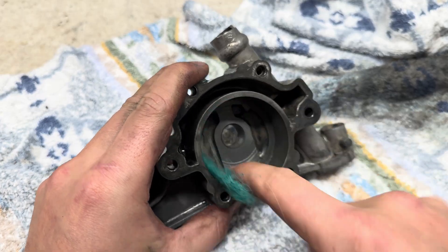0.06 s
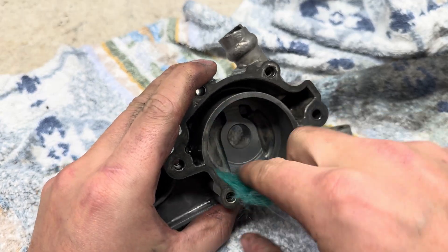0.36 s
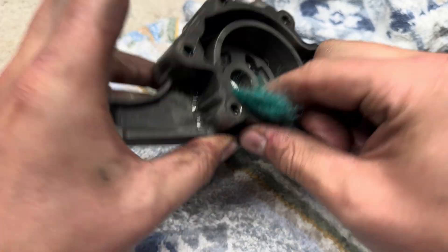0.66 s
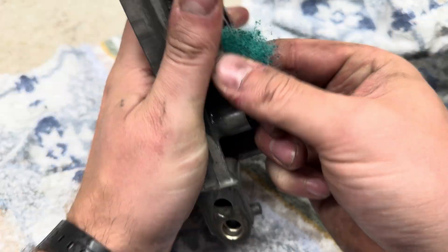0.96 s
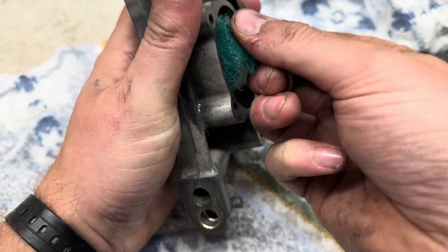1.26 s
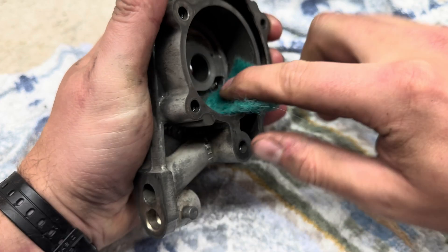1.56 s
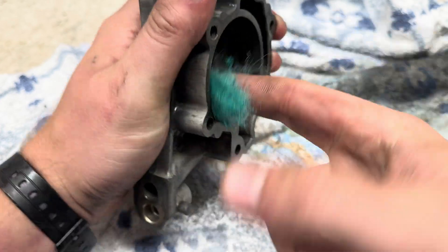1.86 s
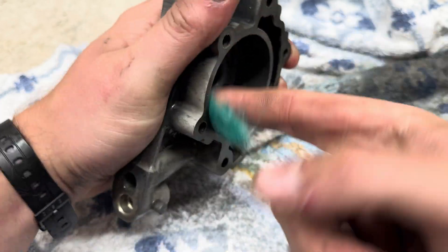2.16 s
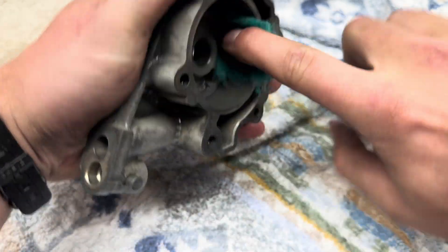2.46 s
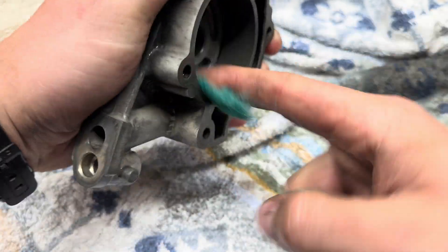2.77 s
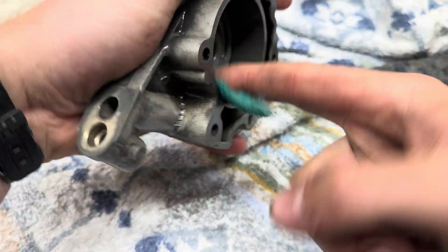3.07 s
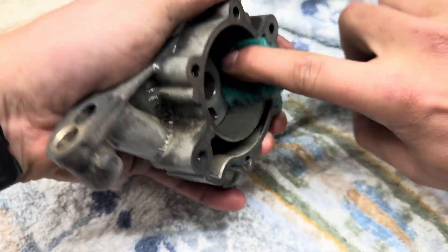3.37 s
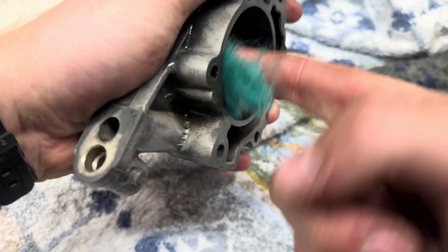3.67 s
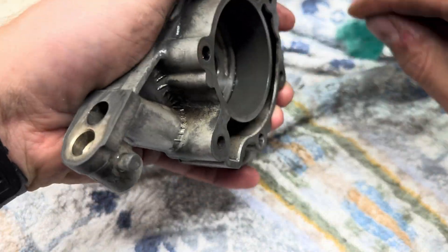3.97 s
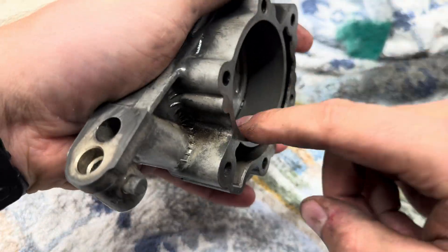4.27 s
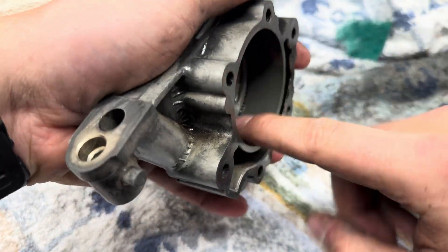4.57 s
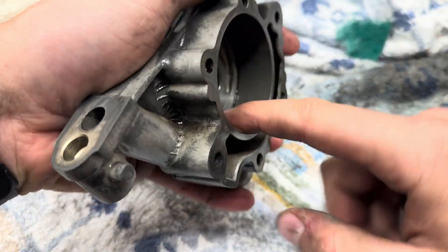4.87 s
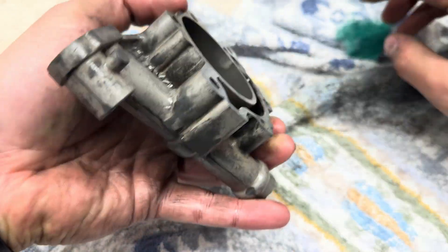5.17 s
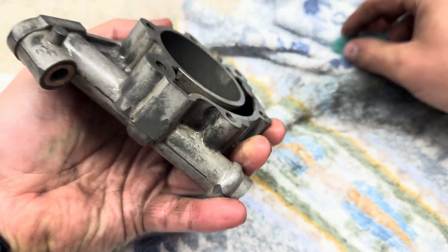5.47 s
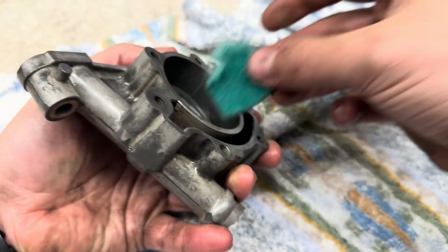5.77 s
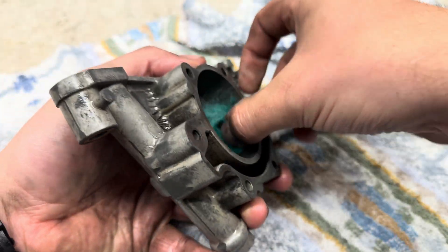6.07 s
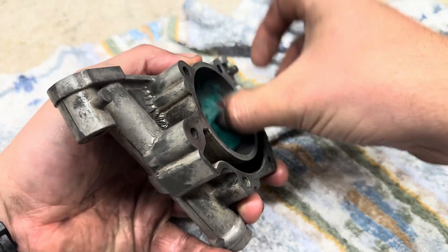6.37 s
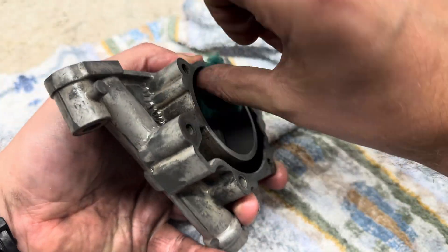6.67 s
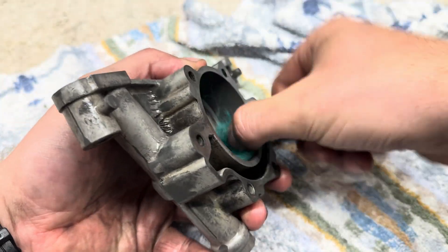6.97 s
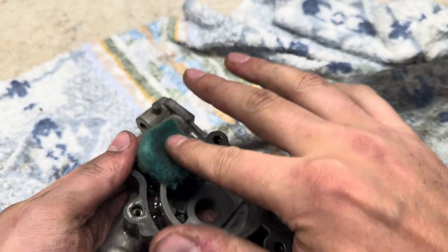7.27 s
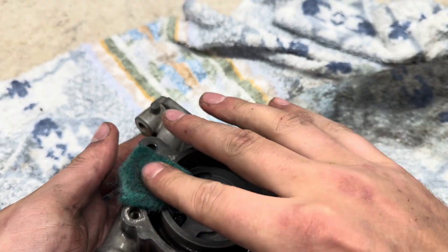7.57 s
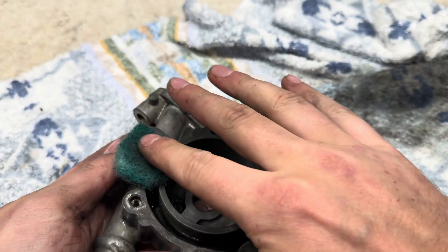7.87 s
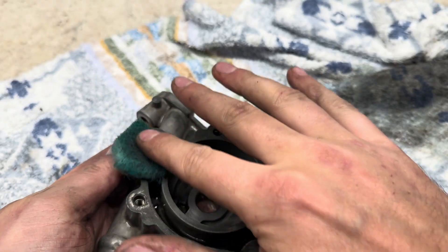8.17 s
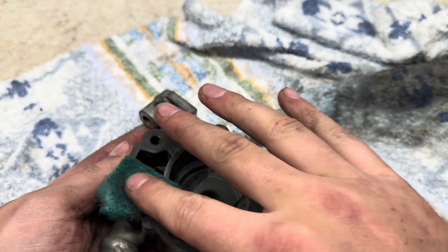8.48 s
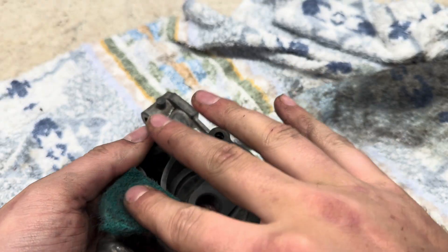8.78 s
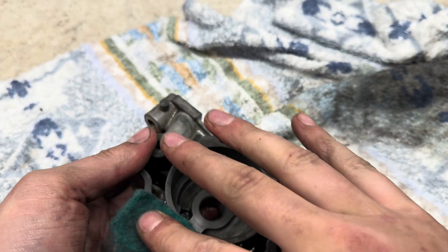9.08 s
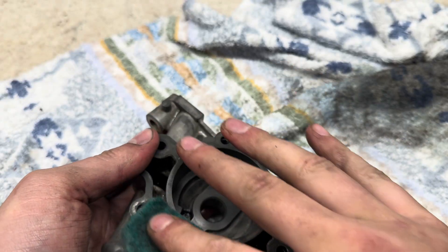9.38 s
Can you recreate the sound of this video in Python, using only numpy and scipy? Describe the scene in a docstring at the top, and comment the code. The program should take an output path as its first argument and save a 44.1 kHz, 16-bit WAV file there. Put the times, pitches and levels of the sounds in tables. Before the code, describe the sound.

An abrasive pad scrubs to and fro inside a hand-held metal casing, each stroke a bright hiss and rasp that faintly rings the metal. A few smoother fingertip wipes and a brief lull come midway before the scrubbing resumes. Near the end the strokes turn short and quick, with tiny squeaks, muffled knocks and a low bench rumble. It is heard close up in a quiet workshop.

```python
"""Scrubbing a metal casing

An abrasive pad is scrubbed to and fro in a hand-held cast metal engine casing, close by in a quiet
workshop. Its fibres catch and slip, hissing and ringing the metal: long pushes and pulls round the bore,
then short quick strokes on the flat face with the part pressed on a towel, where it knocks and rocks
the bench."""
import sys
import numpy as np
from scipy import signal
from scipy.fft import rfft, irfft
from scipy.io import wavfile
from scipy.ndimage import map_coordinates

SR = 44100
rng = np.random.default_rng(int(sys.argv[2]) if len(sys.argv) > 2 else 0)


def dump(signal):
    """Clip the signal to [-1, 1] and save it as 16-bit WAV at the path in sys.argv[1]."""
    limited = np.clip(np.atleast_2d(signal).T, -1, 1)
    pcm = np.round(limited * 32767).astype(np.int16)
    wavfile.write(sys.argv[1], SR, pcm)


N = 416304
T = np.arange(N) / SR
BINS = np.arange(N // 2 + 1) * SR / N
TURN_S = 7.09  # the pad leaves the bore for the flat face
BITE_S, RELEASE_S = 0.01, 0.018  # the pad takes hold and lets go

# The pad snags and the stroke flares: centre_s, length_s, boost_db
PAD_SNAGS = [(2.96, 0.04, 2.5), (3.797, 0.017, 10.5), (4.35, 0.11, 5.5), (4.514, 0.042, 1.5),
             (4.914, 0.01, 8), (8.05, 0.013, 6), (8.322, 0.01, 7.5)]
# The pad digs into an edge and rasps harder: centre_s, length_s, boost_db
PAD_DIGS = [(7.684, 0.022, 5)]
RASP_SHARE = .5  # the rasp swells by this share of the hiss's swell in dB


def scrubbing():
    """The pad grips and lets go in tufts, so every stroke flutters; now and then it snags or digs in."""
    hiss_gain, rasp_gain = motion()
    face = 1. * (T > TURN_S)
    snag_db = sum(db * swell(s, length) for s, length, db in PAD_SNAGS)
    dig_db = sum(db * swell(s, length) for s, length, db in PAD_DIGS)
    tufts = amp(1.6 * walk(35) + 1.35 * walk(350))  # flutter and finer grain
    hiss_gain = hiss_gain * tufts * amp(snag_db)
    rasp_gain = rasp_gain * tufts * amp(RASP_SHARE * snag_db + dig_db)
    return hiss(hiss_gain, face) + rasp(rasp_gain, face) + judder(rasp_gain * face)


# Where the hand is fastest, as a share of the stroke: a push late, a pull early, a sweep midway
PUSH, PULL, SWEEP = 0.73, 0.29, 0.57
# Strokes round the bore, the weak ones drags as the part turns: start_s, length_s, crest_db, crest_share
BORE_PASSES = [(0, 0.16, -41.5, PULL), (0.243, 0.14, -48, SWEEP), (0.401, .13, -55, SWEEP),
               (0.562, .12, -54.5, SWEEP), (0.86, 0.087, -53, SWEEP), (1.098, 0.25, -58.5, SWEEP),
               (1.323, .22, -41, PUSH), (1.601, .15, -41.5, PULL), (1.794, 0.17, -40, PUSH),
               (2.022, .14, -39.5, PULL), (2.218, 0.17, -40.5, PUSH), (2.439, 0.17, -40, PULL),
               (2.666, 0.19, -38, PUSH), (2.896, 0.24, -39.5, PULL), (3.14, 0.19, -39, PUSH),
               (3.377, .2, -39.5, PULL), (3.611, .2, -42, SWEEP), (4.203, 0.22, -49.5, PUSH),
               (4.48, 0.23, -43, PULL), (4.771, 0.17, -43.5, PUSH), (4.974, 0.15, -63, PULL),
               (5.179, 0.21, -58.5, PULL), (5.392, 0.33, -70.5, PULL), (5.813, 0.12, -58, PULL),
               (5.954, 0.3, -46, SWEEP), (6.289, 0.16, -43.5, SWEEP), (6.499, 0.16, -43, SWEEP),
               (6.711, 0.17, -43, SWEEP), (6.959, .12, -43, SWEEP)]
# Quick strokes on the flat face: start_s, length_s, crest_db
FACE_PASSES = [(7.114, 0.022, -44.5), (7.181, 0.063, -44.5), (7.282, 0.061, -40.5), (7.389, 0.071, -42.5),
               (7.493, 0.055, -42.5), (7.582, 0.067, -50.5), (7.658, 0.068, -53.5), (7.761, 0.054, -52),
               (7.832, 0.053, -61.5), (7.91, 0.065, -47), (8.021, 0.076, -43.5), (8.137, 0.1, -45),
               (8.232, 0.12, -43), (8.307, 0.1, -45.5), (8.438, 0.11, -56.5), (8.551, 0.092, -51),
               (8.694, 0.039, -49), (8.78, 0.073, -47), (8.896, 0.067, -45.5), (9.011, 0.07, -43),
               (9.121, 0.069, -43.5), (9.244, 0.078, -39), (9.361, 0.075, -42)]
FINGER_FROM_S, FINGER_TO_S = 4.1, 4.9  # the pad is laid aside and a fingertip wipes the bore


def motion():
    """Hiss and rasp envelopes of all strokes: a fingertip rasps less, the pad on the face more."""
    strokes = []
    for s, length, db, crest in BORE_PASSES:
        fingertip = FINGER_FROM_S < s + length / 2 < FINGER_TO_S
        strokes.append(stroke(s, length, db, crest, fall_db_per_s=80, bite_db=-8.5 if fingertip else 0))
    for s, length, db in FACE_PASSES:
        strokes.append(stroke(s, length, db, crest=0.28, fall_db_per_s=112, bite_db=6.5))
    envelopes = np.zeros((2, N))
    for first, gains in strokes:
        span = slice(first, first + gains.shape[1])
        envelopes[:, span] = np.maximum(envelopes[:, span], gains)
    return envelopes


def stroke(start, length, db, crest, fall_db_per_s, bite_db, rise_db_per_s=67, creep_s=.06):
    """First sample and hiss and rasp gains of a stroke: it takes hold, speeds up, slows and lets go."""
    t = np.arange(int((length + 2 * creep_s) * SR)) / SR - creep_s
    attack = np.clip(t / BITE_S / 2 + 0.5, 0, 1)
    release = np.clip((length - t) / RELEASE_S / 2 + 0.6, 0, 1)
    # the pad still creeps at each turn of direction
    creep = amp(-18) * np.clip(np.minimum(t, length - t) / creep_s + 1, 0, 1)
    past_crest_s = np.clip(t, 0, length) - crest * length
    hiss_db = db + np.minimum(rise_db_per_s * past_crest_s, -fall_db_per_s * past_crest_s)
    rasp_db = -37.5 + RASP_SHARE * hiss_db + bite_db
    gains = amp([hiss_db, rasp_db]) * np.maximum(attack * release, creep)
    first = int((start - creep_s) * SR)
    return max(first, 0), gains[:, max(-first, 0):N - first]


# Tone of the hiss in the bore and on the face: freq_hz, gain_db
BORE_HISS_EQ = [(5000, -41), (7400, -17), (8100, -1.5), (9500, 0.5), (13600, 4.5), (15000, 2.5),
                (16000, -1.5)]
FACE_HISS_EQ = [(5000, -69), (7500, -28), (8200, -1.5), (10200, 2), (14200, -5), (16000, -2)]
# The metal's top modes, stirred by single fibres: pitch_hz, damped_width_hz, bore_db, face_db, free_db
SHIMMER_MODES = [(8250, 210, -22, -18.5, 5), (9340, 140, -10, -10, -3), (10090, 150, -10, -10, 2),
                 (11130, 80, -16, -24, -1), (12550, 74, -24, -12, -6), (13980, 130, -22, -17, -9)]


def hiss(gain, face):
    """The finest fibres hiss and stir the top modes, each now more, now less as the contact moves."""
    fibres = np.array([slips(per_s=17000, scatter_db=0) for _ in range(2)])
    fibres = hollow(fibres, echo=0.32, lag_s=0.000501, sway=0.078, drift_per_s=7)
    bright = (1 - face) * colour(fibres, BORE_HISS_EQ) + face * colour(fibres, FACE_HISS_EQ)
    direct = spread(bright, side=0.083) * gain * amp(-2.5)
    shimmer = 0
    for hz, width, bore_db, face_db, _ in SHIMMER_MODES:
        feed = amp(bore_db + face * (face_db - bore_db) + 3.6 * walk(9.4) - 2)
        shimmer = shimmer + rfft(fibres[0] * gain * feed) * resonance(hz, width)
    return direct + irfft(shimmer, N) / fibres[0].std()


# Tone of the rasp in the bore and on the face: freq_hz, gain_db
BORE_RASP_EQ = [(600, -17), (1200, -9), (1800, 0.5), (2500, -8.5), (3600, -2.5), (4250, 4), (4750, -5.5),
                (5400, -2.5), (7000, -1.5), (11000, -7)]
FACE_RASP_EQ = [(300, -11), (700, -6), (1100, -9), (1600, 7), (2250, -2.5), (4700, 2.5), (6200, -3.5),
                (7500, -4), (11000, -3)]
# The casing's four main modes: pitch_hz, width_hz, pan_left_db, left_lead_rad
WALL_MODES = [(1923, 12.6, -1, 1.83), (2945, 35, 7.5, 1.82), (4330, 39, 7.5, 0.16), (4993, 19, 1, 1.05)]
# Each new grip damps other modes: start_s, mode1_db, mode2_db, mode3_db, mode4_db
GRIP_DAMPING = [(0, -11.5, -12.5, -5.5, -14), (1.77, -7.5, -10.5, -13.5, -13.5), (2.63, -19, -9, -16, -10),
                (4.05, -19, -8.5, -5, -4.5), (5.72, -8, -7.5, -5.5, -10), (7.09, -15, -13.5, -8, -24)]


def rasp(gain, face, bore_catches_per_s=9000, face_catches_per_s=5000):
    """Abrasive grit catches on the casting and rings its walls; the grip decides which modes speak."""
    fine = np.array([slips(bore_catches_per_s, scatter_db=1) for _ in range(2)])
    coarse = np.array([slips(face_catches_per_s, scatter_db=1) for _ in range(2)])
    in_bore = colour(hollow(fine, echo=0.48, lag_s=0.0007976, sway=0.192, drift_per_s=6), BORE_RASP_EQ)
    on_face = colour(hollow(coarse, echo=0.41, lag_s=0.000408, sway=0.25, drift_per_s=13), FACE_RASP_EQ)
    walls = [wander(x, share=.02, per_s=7) for x in in_bore]
    out = spread((1 - face) * walls + face * on_face, side=0.73) * pan(1.8) * gain * amp(2.12)
    # on the face, the pocket of air under the fingers rings broadly and changes size as they move
    pocket = irfft(rfft(coarse[0]) * resonance(hz=1540, width_hz=180), N)
    out += pan(15.4) * wander(pocket, share=.07, per_s=20) * face * gain * amp(-15.5)
    grips = np.array(GRIP_DAMPING)
    held_db = grips[np.searchsorted(grips[1:, 0], T), 1:].T
    for mode, db in zip(WALL_MODES, held_db):
        feed = amp(db - 1 + 3.2 * walk(16))
        out += ring(slips(bore_catches_per_s, scatter_db=1) * gain * feed, *mode)
    return out


def hollow(pair, echo, lag_s, sway, drift_per_s):
    """Echoes between wall and fingers: the grip differs and drifts, giving each stroke its own colour."""
    starts = [row[0] - BITE_S for row in BORE_PASSES + FACE_PASSES]
    stroke_index = np.searchsorted(starts, T)
    for lag_ratio in (.5, 1, 2):
        grip = rng.standard_normal(len(starts) + 1)[stroke_index]
        delay_s = lag_ratio * lag_s * np.exp(sway * grip + .05 * walk(drift_per_s))
        pair = pair + echo * np.array([np.interp(T - delay_s, T, x) for x in pair])
    return pair


# The low scuff grows as the hand leans harder on the part: time_s, gain_db
JUDDER_RIDE = [(8.2, -17.5), (9.4, -5)]


def judder(gain):
    """Each stroke on the face shakes the casing against the towel with a low scuff."""
    shake = bandpass(rng.standard_normal((2, N)), 100, 500)
    return spread(shake, side=0.35) * gain * curve(JUDDER_RIDE)


# Brief squeals, each on the wall mode nearest its pitch: centre_s, length_s, pitch_hz, level_db
SQUEALS = [(0.474, 0.12, 1930, -60), (0.628, 0.068, 1930, -51), (0.656, 0.019, 5000, -57.5),
           (0.906, .07, 1930, -62), (1.302, 0.071, 1930, -55.5), (2.82, 0.051, 5000, -60),
           (3.295, .07, 5000, -65), (3.784, 0.029, 2950, -63.5), (5.047, 0.24, 2950, -71.5),
           (5.277, 0.037, 1930, -59.5), (5.604, 0.043, 5000, -67.5), (6.22, .06, 1930, -60),
           (8.215, 0.054, 4330, -55.5), (8.36, 0.11, 4330, -58), (8.607, 0.072, 4330, -51)]


def singing(decay_db_per_s=251):
    """Stick and slip lock on to a mode: a thin, wavering tone swells and rings away."""
    out = np.zeros((2, N))
    for hz, _, pan_db, lead in WALL_MODES:
        gain = np.zeros(N)
        for s, length, sung_hz, db in SQUEALS:
            if abs(sung_hz / hz - 1) < .03:
                tail = (T > s) * amp(-decay_db_per_s * np.clip(T - s, 0, 1))
                gain += amp(db) * np.maximum(swell(s, length), tail)
        phase = 2 * np.pi * hz * T + .6 * walk(50) + np.array([[lead], [-lead]]) / 2
        out += pan(pan_db) * unit(np.sin(phase)) * gain * amp(2.2 * walk(60))
    return out


# The casing is turned and slides over the fingers: start_s, length_s, level_db
FINGER_SLIDES = [(4.986, 0.18, -61), (5.169, 0.21, -69)]


def sliding():
    """With no pad to damp them, the top modes ring thin and clear as the metal slides over the fingers."""
    gain = np.zeros(N)
    for s, length, db in FINGER_SLIDES:
        add(gain, s, amp(db) * arch(length))
    free_modes = sum(amp(db) * resonance(hz, width_hz=28) for hz, *_, db in SHIMMER_MODES)
    friction = slips(per_s=7200, scatter_db=1) * gain
    return irfft(rfft(friction) * free_modes / free_modes.std(), N)


# A nail or a snagged fibre flicks the metal: start_s, peak_db, centre_hz, decay_s
FLICKS = [(0.279, -50, 1560, 0.023), (0.694, -46, 1340, 0.0079), (2.529, -54, 1210, 0.0088),
          (2.556, -57, 1120, 0.0046), (3.494, -52, 1310, 0.0083), (3.78, -51, 900, 0.0068),
          (3.797, -43, 1300, 0.0052), (5.632, -51, 1820, 0.0049), (6.357, -57, 1100, 0.0072),
          (6.486, -59, 1100, 0.0065), (7.11, -59, 1200, 0.0065), (7.224, -40.5, 4740, 0.0063),
          (7.921, -43, 3020, 0.0027)]


def ticks(ring_db=-24):
    """Each flick is a short crack that leaves the casing ringing."""
    cracks, t = np.zeros(N), T[:SR // 10]
    for s, db, hz, decay in FLICKS:
        noise = signal.lfilter(*signal.iirpeak(hz, Q=1, fs=SR), rng.standard_normal(len(t)))
        crack = noise * np.exp(-t / decay)
        add(cracks, s, amp(db) * crack / abs(crack).max())
    casing = sum(resonance(hz, width) for hz, width, *_ in WALL_MODES)
    return cracks + amp(ring_db) * irfft(rfft(cracks) * casing, N)


# The casing knocks through the towel: start_s, force_db, contact_s
TOWEL_KNOCKS = [(5.533, -55.5, 0.005), (5.695, -46, 0.023), (8.549, -40.5, .0012), (8.562, -40, 0.0012),
                (8.577, -31.5, 0.0045), (8.601, -37, 0.0077), (8.817, -40.5, 0.0091),
                (8.966, -44.5, 0.0044)]
# The bench's body: pitch_hz, gain_db, t60_s
BENCH_BODY = [(55, 3, 0.43), (97.4, 0, 0.24), (138, 3, 0.077), (258, 2.5, 0.038), (326, 7.5, 0.048),
              (418, 0, 0.055), (810, -5, 0.028)]
# Tone of the bench's rumble: freq_hz, gain_db
RUMBLE_EQ = [(38, -18), (53, 4), (72, -15), (97, -8), (150, -22), (900, -51)]
# The rumble rising and falling under the hands: time_s, level_db
RUMBLE_RIDE = [(5.4, -81), (5.65, -67), (5.9, -71.5), (7.1, -78), (7.3, -61.5), (7.7, -56.5), (7.85, -72),
               (8.52, -57.5), (9.13, -49), (9.22, -47.5)]


def bench():
    """Knocks ring the bench, the softer the duller, and it rumbles under the working hands."""
    knocks, t = np.zeros(N), T[:SR // 2]
    body = sum(amp(db - 60 * t / t60) * np.sin(2 * np.pi * hz * t) for hz, db, t60 in BENCH_BODY)
    for s, db, contact in TOWEL_KNOCKS:
        push = np.sin(np.pi * np.minimum(t / contact, 1))
        add(knocks, s, amp(db) * signal.fftconvolve(body, push / push.sum()))
    rumble = spread(colour(rng.standard_normal((2, N)), RUMBLE_EQ), side=0.1)
    return knocks + rumble * curve(RUMBLE_RIDE)


# Tone of skin on metal: freq_hz, gain_db
SKIN_EQ = [(50, -1), (250, 2), (520, -3), (720, -15.5), (1500, -8.5), (4000, -19.5), (16000, -16.5)]
# Palm and fingers shifting their hold: time_s, level_db
HANDLING_RIDE = [(0, -70.5), (.8, -64.5), (1.15, -70), (1.45, -70), (2.4, -77.5), (3.3, -82), (3.85, -66),
                 (4.1, -81), (5.15, -80), (5.35, -71), (5.55, -73), (5.8, -78.5)]


def hands():
    """Skin drags dully and unevenly over the casting."""
    skin = np.array([slips(per_s=2500, scatter_db=2.5) for _ in range(2)])
    flutter = amp(2.5 * walk(16))
    return spread(colour(skin, SKIN_EQ), side=0.66) * curve(HANDLING_RIDE) * flutter


# Skin drags on the casing and sounds the hollow of the hand: start_s, length_s, level_db, pitch_hz
PALM_RUBS = [(0.31, 0.2, -76, 530), (0.59, 0.37, -72, 536), (1.02, 0.2, -77, 492), (1.66, 0.19, -71, 470),
             (2.9, 0.28, -73.5, 492), (3.426, 0.2, -72, 494), (3.636, 0.33, -74, 541),
             (6.022, 0.24, -78, 445)]


def rubs():
    """Each drag of skin is a dull scuff with a hollow note on top, set by how the hand is cupped."""
    out, skin = np.zeros(N), slips(per_s=1000, scatter_db=2)
    scuff = unit(bandpass(skin, 170, 540, order=3))
    for s, length, db, hz in PALM_RUBS:
        gain = arch(length)
        span = slice(int(s * SR), int(s * SR) + len(gain))
        cavity = signal.iirpeak(hz, Q=hz / 32, fs=SR)
        note = unit(signal.lfilter(*cavity, signal.lfilter(*cavity, skin[span])))
        add(out, s, amp(db) * gain * (note + scuff[span]))
    return out


def rustle(start_s=5.25, length_s=.16, level_db=-71):
    """Dry skin crackles in the middle range as the casing rolls over."""
    gain = np.zeros(N)
    add(gain, start_s, amp(level_db) * arch(length_s))
    return unit(bandpass(slips(per_s=1500, scatter_db=2), 750, 1900)) * gain


# Room tone of the workshop: freq_hz, gain_db
ROOM_EQ = [(60, 4), (95, -6.5), (450, -12.5), (650, -20.5), (1200, -24), (1850, -5.5), (2400, -12),
           (3800, -23.5), (16000, -32)]


def workshop(hum_hz=50):
    """Faint steady room noise, a little stronger on the left, and a low hum."""
    air = spread(colour(rng.standard_normal((2, N)), ROOM_EQ), side=0.4) * pan(4.2)
    hum = np.sin(2 * np.pi * hum_hz * T)
    return (air + hum) * amp(-71)


def slips(per_s, scatter_db):
    """Friction as tiny random clicks of letting go, a few larger than the rest."""
    size = amp(scatter_db * np.minimum(rng.exponential(size=N), 5))
    return unit((rng.random(N) < per_s / SR) * size * rng.standard_normal(N))


def resonance(hz, width_hz):
    """Frequency response of one damped mode, of power 1."""
    response = 1j * BINS * width_hz / (hz ** 2 - BINS ** 2 + 1j * BINS * width_hz)
    return response / np.sqrt(np.mean(abs(response) ** 2))


def ring(drive, hz, width_hz, pan_db, lead_rad):
    """A mode rung by the drive; its lobes reach left and right with their own level and phase."""
    spectrum = rfft(drive) * resonance(hz, width_hz)
    return pan(pan_db) * irfft(spectrum * np.exp(.5j * np.array([[lead_rad], [-lead_rad]])), N)


def wander(x, share, per_s):
    """Let every resonance in x slide up and down by a share of its pitch."""
    return map_coordinates(x, [np.cumsum(1 + share * walk(per_s))], order=1, mode="mirror")


def walk(per_s):
    """Random drift that turns per_s times a second; spread near 1."""
    count = int(T[-1] * per_s) + 2
    return np.interp(T * per_s, np.arange(count), rng.standard_normal(N // 20)[:count])


def colour(x, eq):
    """Shape x with (freq_hz, gain_db) points, at rms 1."""
    hz, db = np.transpose(eq)
    return unit(irfft(rfft(x) * amp(np.interp(np.log(BINS + 1), np.log(hz), db)), N))


def bandpass(x, low_hz, high_hz, order=2):
    """Keep one band of x."""
    return signal.sosfilt(signal.butter(order, [low_hz, high_hz], "band", fs=SR, output="sos"), x)


def swell(centre_s, length_s):
    """A smooth bump of height 1."""
    return np.exp(-np.minimum((2 * (T - centre_s) / length_s) ** 2, 20))


def arch(length_s):
    """Envelope of a short drag: a rounded rise and fall."""
    return np.sqrt(np.sin(np.linspace(0, np.pi, int(length_s * SR), endpoint=False)))


def curve(ride):
    """Gain that follows (time_s, level_db) points."""
    return amp(np.interp(T, *np.transpose(ride)))


def pan(left_db):
    """Stereo gains with the left louder by left_db."""
    return amp(np.array([[left_db], [-left_db]]) / 2)


def spread(pair, side):
    """Two unrelated signals become the mid and side of a stereo sound, at rms 1."""
    return unit(np.array([pair[0] + side * pair[1], pair[0] - side * pair[1]]))


def add(out, start_s, sound):
    """Mix a short sound in."""
    i = int(start_s * SR)
    out[i:i + len(sound)] += sound[:N - i]


def amp(db):
    """Decibels to gain."""
    return 10 ** (np.asarray(db) / 20)


def unit(x):
    """Scale to rms 1."""
    return x / np.sqrt(np.mean(x ** 2))


def scene():
    """Pad, metal, bench, hands and room, mixed in stereo."""
    metal = scrubbing() + singing() + sliding() + ticks()
    return metal + bench() + hands() + rubs() + rustle() + workshop()


def record(dry, low_cut_hz=38.4, high_cut_hz=15800):
    """The phone's stereo pair lets the left lag in the high treble; deep bass and top are cut steeply."""
    low_cut = signal.butter(6, low_cut_hz, "high", fs=SR, output="sos")
    spectrum = rfft(signal.sosfilt(low_cut, dry))
    spectrum[0] *= np.exp(-2j * np.pi * np.maximum(BINS - 8100, 0) * .00033)  # 0.33 ms above 8100 Hz
    high_cut = np.clip((high_cut_hz - BINS) / 100 + .5, 0, 1)
    return irfft(spectrum * high_cut, N)


dry = scene()
out = record(dry)
dump(out)
```